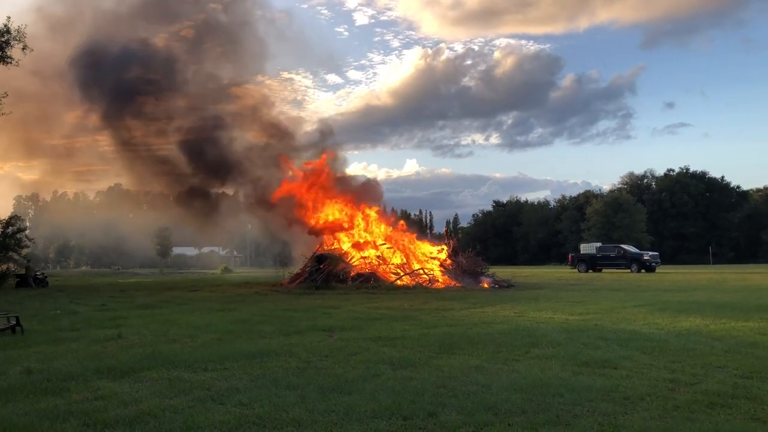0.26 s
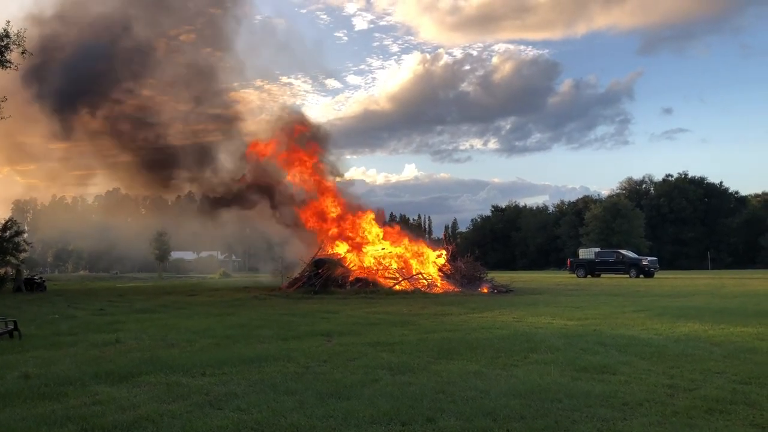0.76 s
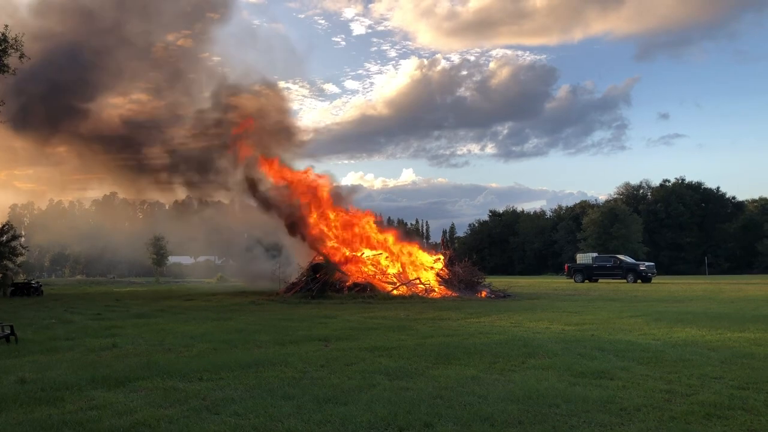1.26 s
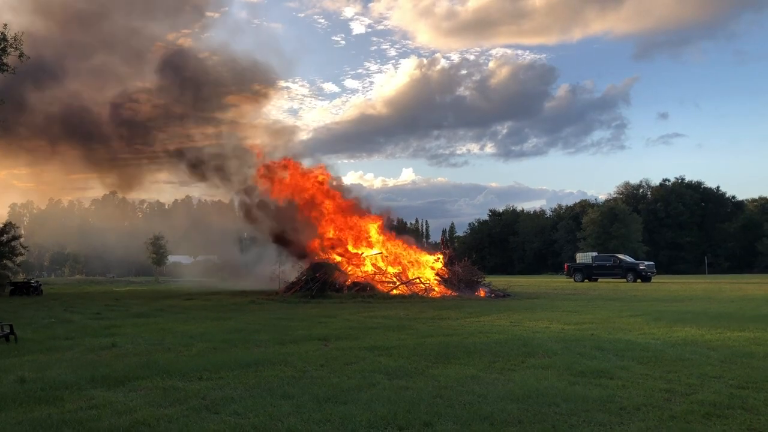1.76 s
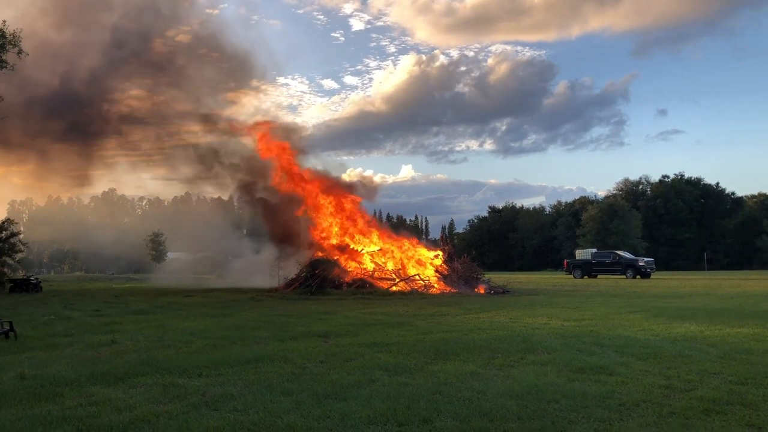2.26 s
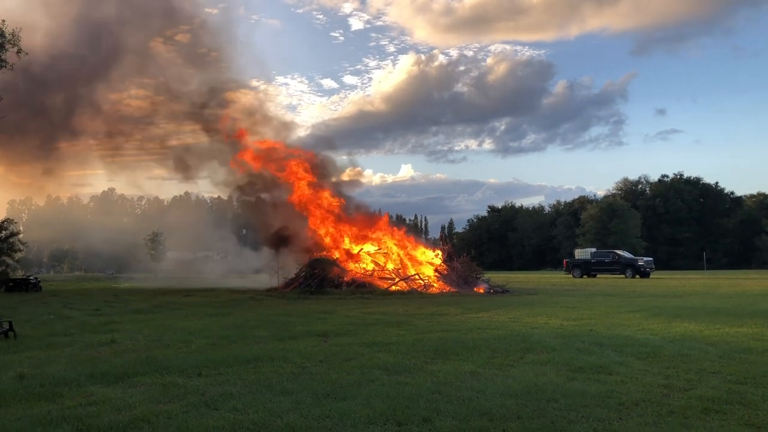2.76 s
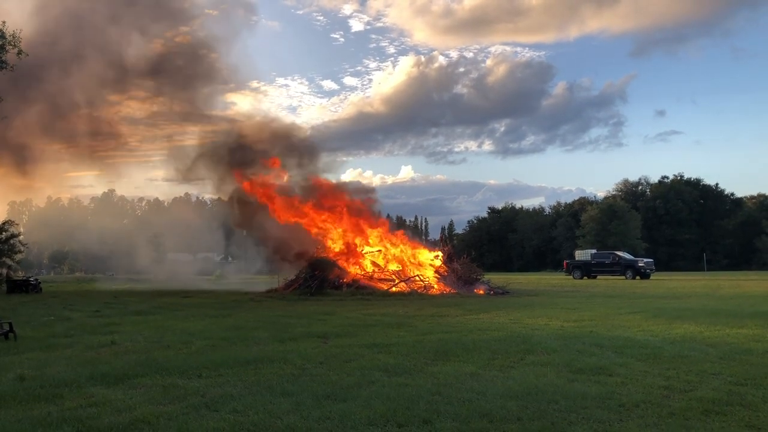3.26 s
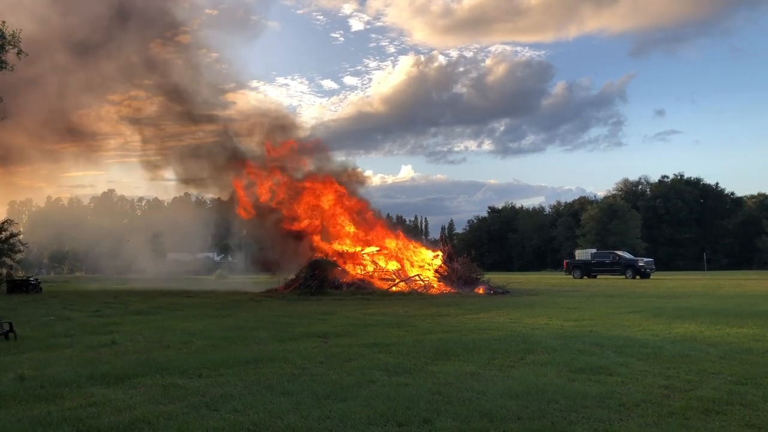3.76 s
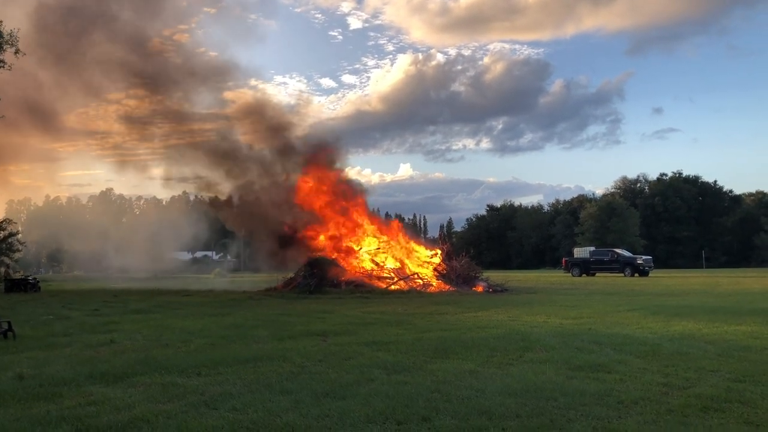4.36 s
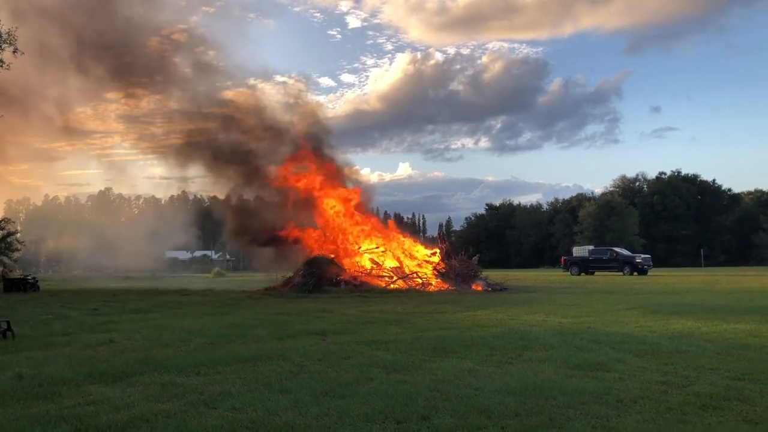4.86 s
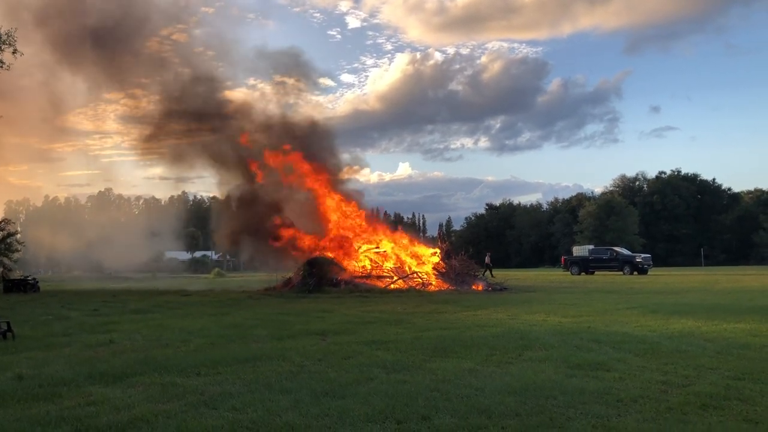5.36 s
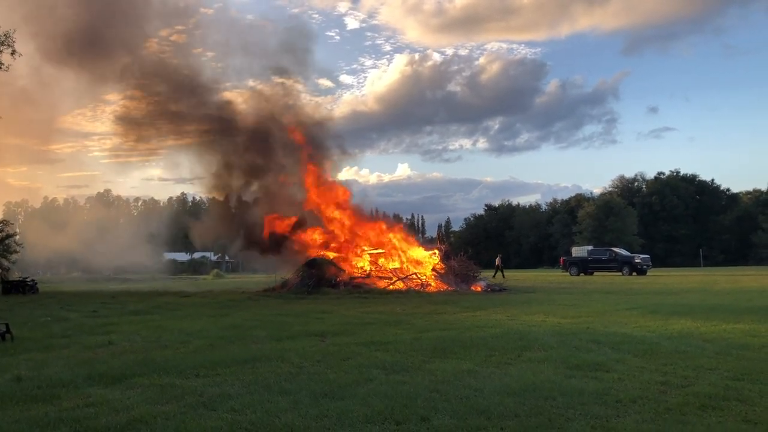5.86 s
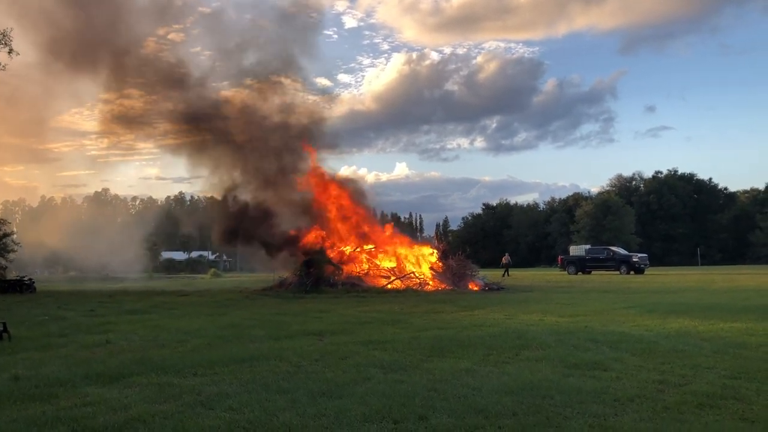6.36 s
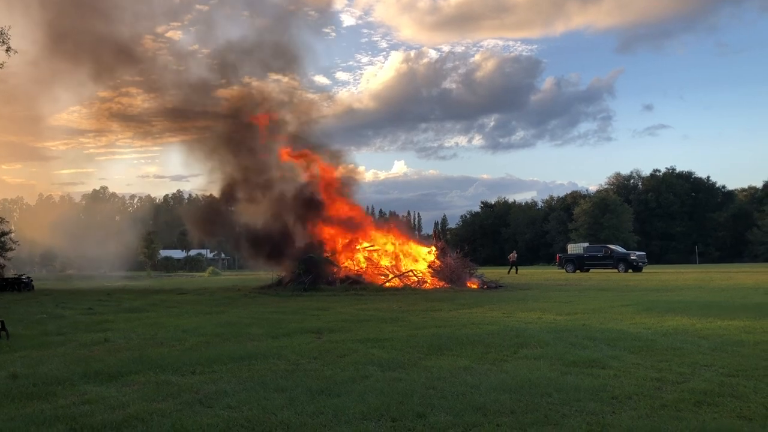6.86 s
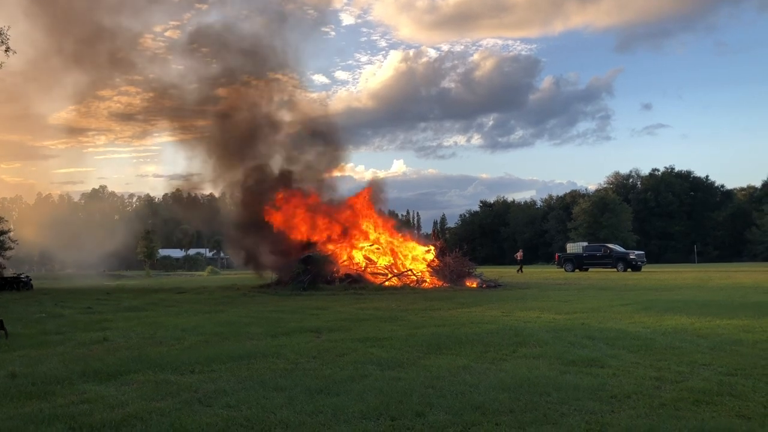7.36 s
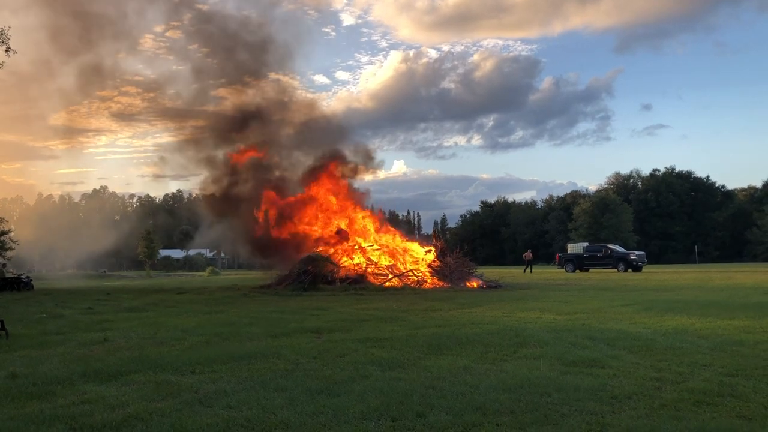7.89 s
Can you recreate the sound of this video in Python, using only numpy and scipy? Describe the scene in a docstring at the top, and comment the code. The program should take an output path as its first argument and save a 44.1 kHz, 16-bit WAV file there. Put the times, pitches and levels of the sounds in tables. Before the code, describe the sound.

Dense, bright crackling comes from a big outdoor bonfire, mixed with duller snaps of wood and a light hiss. At the start a faint far horn dies away and one loud pop cracks out. Smaller sharp pops keep coming irregularly over the low throb of two idling engines and rumbling flames, until a second loud pop at the end. A single small microphone picks it up in open air.

```python
"""A big brush bonfire in an open field. From the start: dense crackle of snapping twigs, steam hiss and
fluttering flames, with two engines idling nearby that give most of the low throb. A faint, far two-note
horn fades within the first second. From 0.26 s on, steam pockets burst in the wood: sharp pops, each
scattered through the pile. The loudest two come at 0.26 s and at 8.07 s, just before the end."""
import sys
import numpy as np
from scipy import signal
from scipy.fft import rfft, irfft, next_fast_len
from scipy.io import wavfile

SR = 44100
rng = np.random.default_rng(int(sys.argv[2]) if len(sys.argv) > 2 else 0)


def dump(signal):
    """Clip the signal to [-1, 1] and save it as 16-bit WAV at the path in sys.argv[1]."""
    limited = np.clip(np.atleast_2d(signal).T, -1, 1)
    pcm = np.round(limited * 32767).astype(np.int16)
    wavfile.write(sys.argv[1], SR, pcm)


N = 358533
TIME_S = np.arange(N) / SR
LEAD_SAMPLES = 128

# slow drift of the crackling bed: time_s, treble_db, midrange_db
BED_DRIFT = [(0.0, -51.5, -46.5), (0.38, -57, -45), (0.65, -56, -46.5), (2.2, -52.5, -50),
             (2.4, -57.5, -48), (3.51, -53.5, -48), (3.89, -57, -46), (4.44, -56, -50.5),
             (5.27, -53.5, -51.5), (5.95, -55.5, -47), (6.52, -58.5, -47.5), (8.13, -54, -47.5)]
# spectrum of steam and far crackle: freq_hz, density_db
HISS_SPECTRUM = [(450, -9.5), (700, -2), (1000, 0), (1500, 5), (2000, -1.5), (3000, -1), (5200, -7),
                 (6500, -10), (10000, -13.5), (16000, -17)]
# spectrum of turbulent flames and exhaust: freq_hz, density_db
ROAR_SPECTRUM = [(20, -53), (32, -22), (45, -6), (70, 0), (105, 3.5), (132, -9.5), (172, -3), (205, -14),
                 (270, -9), (335, -16.5), (390, -12.5), (510, -21), (800, -19), (1500, -49.5)]
# small diesel: cycle_multiple, level_db
DIESEL_ORDERS = [(2, -49.5), (4, -50), (5, -46), (6, -56), (7, -64), (8, -64.5), (9, -65.5), (10, -66.5),
                 (11, -81), (20, -69.5), (28, -65.5), (35, -68), (64, -60.5)]
# big engine: crank_multiple, level_db
BIG_ENGINE_ORDERS = [(4, -63), (5, -58), (6, -78), (7, -64), (8, -50), (9, -51.5), (10, -44.5), (11, -87),
                     (15, -63.5), (16, -66)]
# far horn: pitch_hz, level_db
HORN_NOTES = [(418, -56.5), (520, -59)]
# loudest steam bursts: start_s, level_db, pitch_hz, relative_tail_db
STEAM_POPS = [(0.2563, -34, 3350, 6), (0.2646, -13, 4260, -7.5), (0.338, -24, 4800, 0),
              (0.3725, -24.5, 2350, -12), (0.4065, -30, 1540, -2), (0.5019, -23.5, 1720, 1),
              (0.5494, -27, 2970, -3), (0.6395, -22, 4870, -3.5), (0.6944, -38, 7800, 1),
              (0.8994, -29, 4600, -7), (0.93, -35.5, 1600, 6), (0.9528, -27, 1150, -1),
              (1.056, -33, 9550, 8.5), (1.156, -33, 1890, 0), (1.3483, -37.5, 3420, 0),
              (1.4689, -32, 1550, -6), (1.5243, -29.5, 3500, 7), (1.6421, -29, 4300, 5.5),
              (1.8833, -28, 5730, -1), (1.894, -33, 8600, 1), (1.9124, -29, 4520, 0), (2.2, -35.5, 8900, 1),
              (2.2133, -37, 3240, 8), (2.2914, -28.5, 9400, -2), (2.38, -32, 2560, 1),
              (2.404, -26.5, 3730, 2), (2.5738, -28.5, 1010, -4), (2.5746, -23.5, 2440, 4.5),
              (2.609, -39, 7800, 2), (2.641, -35.5, 3440, 8), (2.6516, -32, 4500, 8.5),
              (2.7498, -36, 7700, -7), (2.9948, -24.5, 3460, -7), (3.1555, -31, 3050, 3),
              (3.209, -28.5, 1450, -18), (3.3365, -33.5, 6800, 6.5), (3.586, -22.5, 4100, 3),
              (3.8108, -27.5, 2890, -1.5), (3.892, -33.5, 6400, 4), (3.9764, -38.5, 2740, 9),
              (4.1233, -33.5, 2130, 5.5), (4.1527, -25, 7800, -2), (4.1634, -25.5, 4840, -6),
              (4.4434, -36, 5530, 7), (4.462, -28.5, 3560, -5), (4.483, -33.5, 5900, 1),
              (4.6336, -29.5, 1080, -6), (4.6352, -27, 4560, -17), (4.8454, -30.5, 9900, -5),
              (4.9516, -33.5, 3360, 1), (5.162, -26, 7900, -0.5), (5.269, -34, 3860, 0),
              (5.3242, -27, 6550, 1), (5.3889, -23.5, 2200, -4), (5.4536, -39, 4500, 8.5),
              (5.6245, -23.5, 7000, 2), (5.663, -23, 5700, -4), (5.672, -35.5, 5000, 5),
              (5.7165, -33, 9200, -12), (5.744, -20, 7060, -5), (5.7768, -33.5, 5800, -3),
              (5.8312, -35, 4500, -2), (5.846, -28, 4940, -8), (6.0058, -30.5, 3660, 6),
              (6.1046, -33.5, 8700, -3), (6.1296, -32, 2760, -16), (6.1367, -28.5, 8300, 2),
              (6.2578, -35, 3840, -13), (6.4058, -28.5, 4420, 1.5), (6.4418, -32.5, 6730, -15),
              (6.4807, -35, 6030, 5.5), (6.816, -35.5, 6860, 1), (6.9436, -27, 4600, 3.5),
              (7.2543, -32.5, 4370, -8), (7.3224, -32, 2360, -3), (7.648, -31.5, 3600, 5.5),
              (7.7415, -34, 7100, -11), (7.792, -27, 2480, 1), (7.865, -25.5, 9900, -10),
              (7.8786, -30.5, 5300, -4), (7.9381, -23.5, 5960, -6), (7.9795, -29.5, 5500, -15.5),
              (8.0463, -32.5, 5000, 1), (8.06, -35, 5030, 4), (8.0708, -13, 7960, -6)]
# microphone response: freq_hz, gain_db
MIC_RESPONSE = [(2400, -1), (3100, -2), (3700, 0.5), (5300, 3), (6600, -1), (8200, 1.5), (10000, -0.5),
                (13000, 5.5), (16000, 2.5)]


def undb(db):
    """Decibels to gain."""
    return 10 ** (np.asarray(db) / 20)


def unit_rms(x):
    """Scale to rms 1."""
    return x / np.sqrt(np.mean(x ** 2))


def wander(rate_hz):
    """Smooth noise below about rate_hz; rms 1."""
    hz = np.fft.rfftfreq(N, 1 / SR)
    return unit_rms(irfft(rfft(rng.standard_normal(N)) / (1 + (hz / rate_hz) ** 4), N))


def fluttering_noise(spectrum, flutter_db, flutter_hz):
    """Noise of wandering level, shaped to a spectrum; rms 1."""
    noise = rng.standard_normal(N) * undb(flutter_db * wander(flutter_hz))
    hz, db = np.transpose(spectrum)
    size = next_fast_len(N)
    log_hz = np.log(np.fft.rfftfreq(size, 1 / SR) + 1)
    gain = undb(np.interp(log_hz, np.log(hz), db))
    return unit_rms(irfft(rfft(noise, size) * gain, size)[:N])


def minimum_phase(gain_db):
    """Causal frequency response: sharp front, then the ring."""
    cepstrum = irfft(gain_db * np.log(10) / 20)
    half = len(cepstrum) // 2
    cepstrum[1:half] *= 2
    cepstrum[half + 1:] = 0
    return np.exp(rfft(cepstrum))


def snap(pitch_hz, width_oct, tail_db, ring_db=2.0, ring_oct=0.26, tear=0.58, tear_s=0.00045,
         rebound=0.1, pile_s=0.0019, field_s=0.014, field_db=-15, size=4096):
    """One steam pocket bursts and rings a splinter; the direct part has the energy of 1 ms at rms 1."""
    t, hz = np.arange(size) / SR, np.fft.rfftfreq(size, 1 / SR) + 1
    # splinter: broad hump, woody ring, too small to radiate bass
    offset_oct = np.log2(hz / pitch_hz)
    hump_db = -75 * np.log(1 + (offset_oct / max(width_oct, 0.25)) ** 2 / 30) - 10 * np.log10(hz)
    peak_db = ring_db / (1 + (offset_oct / ring_oct) ** 2)
    bass_loss_db = 10 * np.log10(1 + (min(1200, 0.67 * pitch_hz) / hz) ** 8)
    splinter = minimum_phase(hump_db + peak_db - bass_loss_db)
    # impulse plus tearing fibres, roughly whitened
    crack = tear * rng.standard_normal(size) * np.exp(-t / tear_s)
    crack[0] += 1
    power = np.abs(rfft(crack)) ** 2
    crack = irfft(rfft(crack) * minimum_phase(-10 * np.log10(power + power.mean() / 2)))
    rebound_s = np.ceil(tear_s * pitch_hz) / pitch_hz  # kicks back after whole cycles
    crack = crack + rebound * np.roll(crack, int(SR * rebound_s))
    # branches scatter it; a weak part lingers over the field
    scatter = rng.standard_normal(size) * undb(2.5 * rng.standard_normal(size // 16).repeat(16))
    decay = np.exp(-t / pile_s) + undb(field_db) * np.exp(-t / field_s)
    rise = 1 - np.exp(-(t / 0.0011) ** 2)
    direct, tail = (unit_rms(irfft(rfft(part) * splinter)) for part in (crack, scatter * decay * rise))
    return np.roll(direct + undb(tail_db) * tail, LEAD_SAMPLES) * np.sqrt(SR / 1000 / size)


def crackle(snaps_per_s, low_hz, high_hz, width_oct, spread_db, range_db, tail_db, bunching, sticks=32):
    """Sticks, each of its own pitch, snap at random and in flurries; most snaps are tiny."""
    out = np.zeros(N + SR)
    stick_rate_hz = snaps_per_s / sticks * unit_rms(np.exp(bunching * wander(18)))
    for pitch_hz in np.geomspace(low_hz, high_hz, sticks):
        sound = snap(pitch_hz, width_oct, tail_db)
        starts = np.flatnonzero(rng.random(N) < stick_rate_hz / SR)
        levels_db = range_db * np.tanh(spread_db * rng.exponential(size=1024) / range_db)
        for start, level_db in zip(starts, levels_db):
            out[start:start + len(sound)] += undb(level_db) * sound
    return out[:N]


def fire():
    """Bright twigs at the surface, duller logs inside the pile, steam hiss, turbulent flames."""
    time_s, treble_db, midrange_db = np.transpose(BED_DRIFT)
    treble = undb(np.interp(TIME_S, time_s, treble_db))
    midrange = undb(np.interp(TIME_S, time_s, midrange_db))
    twigs = treble * crackle(snaps_per_s=390, low_hz=3760, high_hz=13800, width_oct=0.37,
                             spread_db=5.5, range_db=21, tail_db=-4.5, bunching=0.75)
    logs = midrange * crackle(snaps_per_s=110, low_hz=890, high_hz=4410, width_oct=0.43,
                              spread_db=3, range_db=11.5, tail_db=1, bunching=0.25)
    hiss = np.sqrt(treble * midrange) * fluttering_noise(HISS_SPECTRUM, flutter_db=1.94, flutter_hz=44)
    roar = fluttering_noise(ROAR_SPECTRUM, flutter_db=1, flutter_hz=2.8)
    return undb(-2.5) * twigs + undb(-2) * logs + undb(3.06) * hiss + undb(-43) * roar


def exhaust(rate_hz, orders, rate_drift, uneven_db, smear_rad):
    """Harmonics of a wandering engine rate; less phase smear gives a clearer throb."""
    phase = 2 * np.pi * np.cumsum(rate_hz * (1 + rate_drift * wander(2.45))) / SR
    out = np.zeros(N)
    for multiple, level_db in orders:
        gain = undb(level_db + uneven_db * wander(4.8))
        out += gain * np.sin(multiple * phase + smear_rad * rng.standard_normal())
    return np.sqrt(2) * out


def small_diesel(cycle_hz=30.21):
    """Exhaust at a near-steady idle."""
    return exhaust(cycle_hz, DIESEL_ORDERS, rate_drift=0.00177, uneven_db=1.5, smear_rad=1.79)


def big_engine(idle_hz=10.75, hunt_hz=0.16, hunt_period_s=1.9, fastest_at_s=4.55):
    """Lumpy, hunting idle: the crank rate swings about its mean."""
    crank_hz = idle_hz + hunt_hz * np.cos(2 * np.pi * (TIME_S - fastest_at_s) / hunt_period_s)
    return exhaust(crank_hz, BIG_ENGINE_ORDERS, rate_drift=0.00522, uneven_db=3, smear_rad=0.34)


def horn(half_gain_at_s=0.51, fade_s=0.17, waver_db=2.4):
    """Two far, wavering notes die away over the field."""
    fade = (1 - np.tanh((TIME_S - half_gain_at_s) / fade_s)) / 2
    notes = sum(undb(level_db + waver_db * wander(4.6)) * np.sin(2 * np.pi * pitch_hz * TIME_S)
                for pitch_hz, level_db in HORN_NOTES)
    return np.sqrt(2) * fade * notes


def steam_pops(tail_trim_db=-2):
    """Big single bursts, each ringing its own splinter; deeper in the pile, stronger tail."""
    out = np.zeros(N + SR)
    for start_s, level_db, pitch_hz, tail_db in STEAM_POPS:
        width_oct = 0.83 + 0.14 * np.log2(pitch_hz / 4000)  # big, low splinters ring more narrowly
        sound = snap(pitch_hz, width_oct, tail_db + tail_trim_db, ring_db=3, tear=0.49)
        start = int(start_s * SR) - LEAD_SAMPLES
        out[start:start + len(sound)] += undb(level_db) * sound
    return out[:N]


def scene():
    """Fire, engines, horn and pops; mono."""
    return (fire() + small_diesel() + big_engine() + horn() + steam_pops())[None]


def record(dry, cutoff_hz=15900):
    """A small microphone colours the treble; a low-pass cuts the top."""
    hz, gain_db = np.transpose(MIC_RESPONSE)
    impulse = irfft(minimum_phase(np.interp(np.fft.rfftfreq(512, 1 / SR), hz, gain_db)))
    heard = signal.oaconvolve(dry, impulse[None])[:, :N]
    lowpass = signal.ellip(10, 0.2, 70, cutoff_hz, fs=SR, output="sos")
    return signal.sosfilt(lowpass, heard)


dry = scene()
out = record(dry)
dump(out)
```